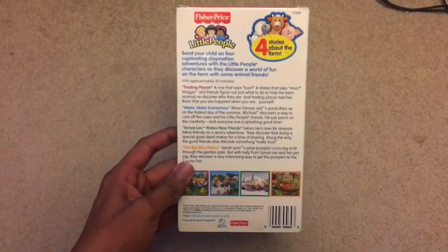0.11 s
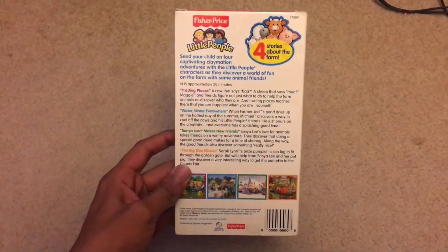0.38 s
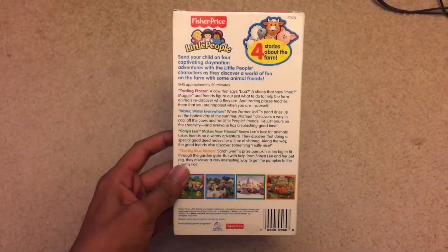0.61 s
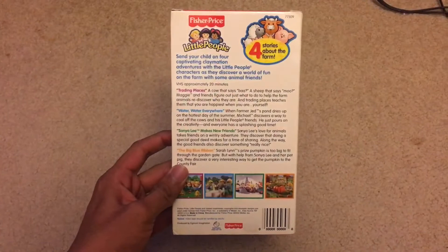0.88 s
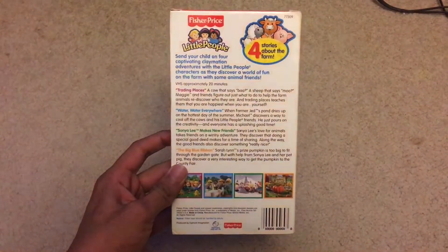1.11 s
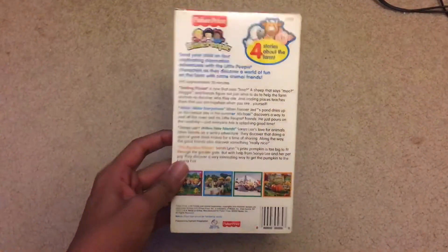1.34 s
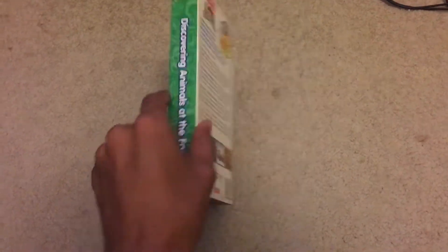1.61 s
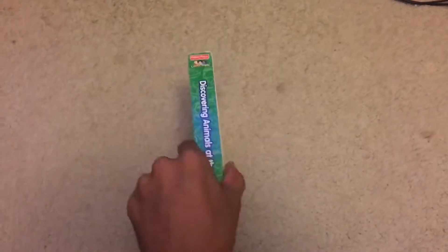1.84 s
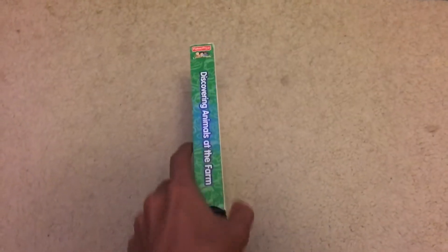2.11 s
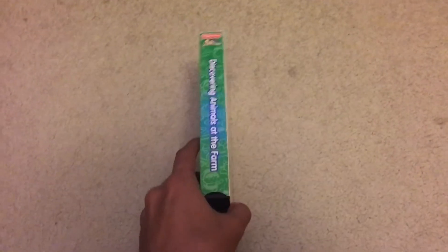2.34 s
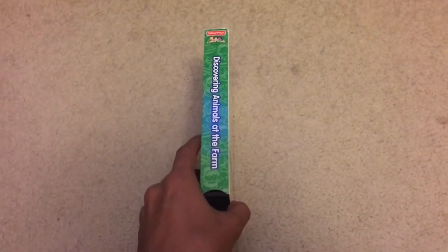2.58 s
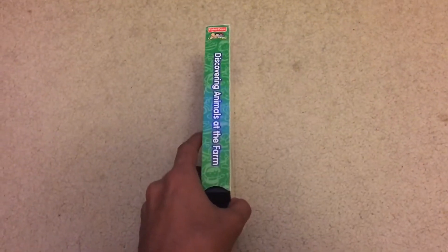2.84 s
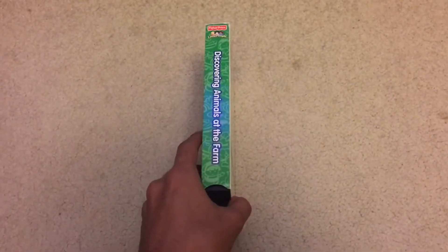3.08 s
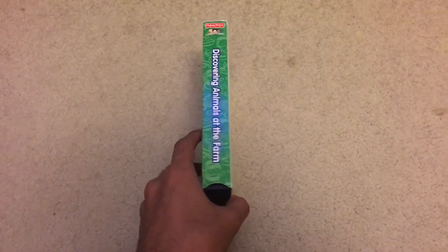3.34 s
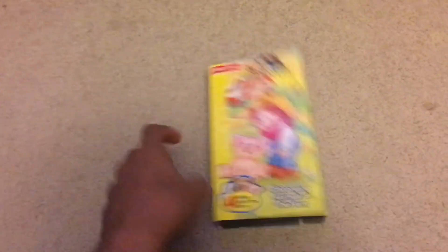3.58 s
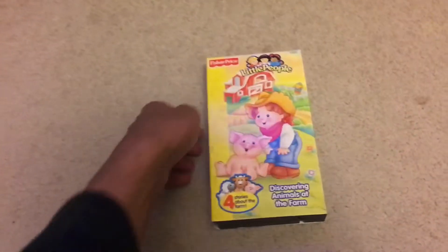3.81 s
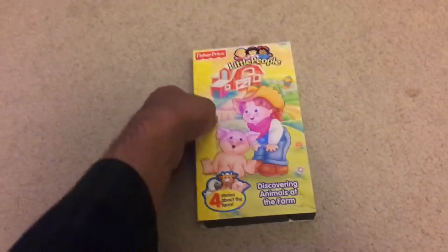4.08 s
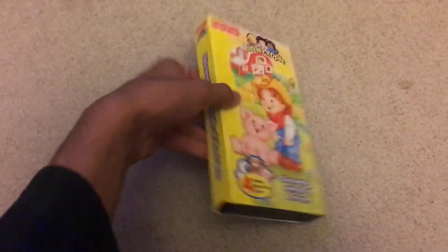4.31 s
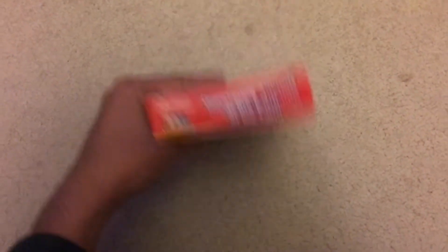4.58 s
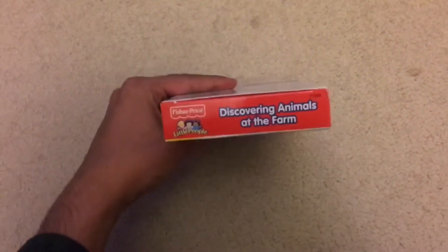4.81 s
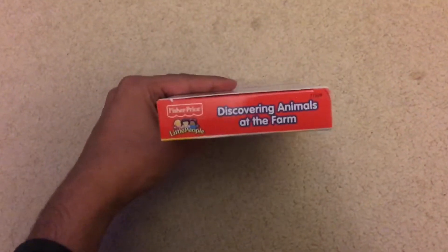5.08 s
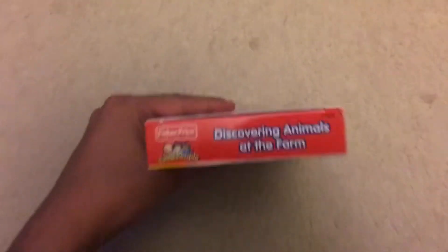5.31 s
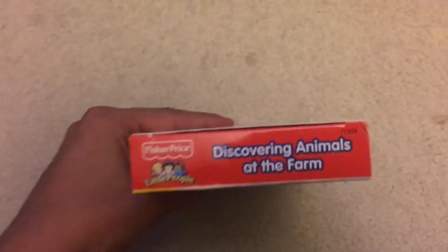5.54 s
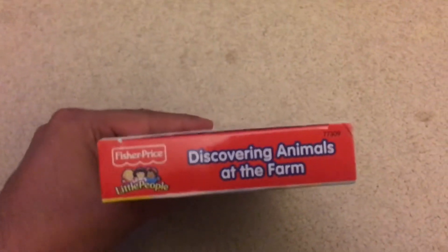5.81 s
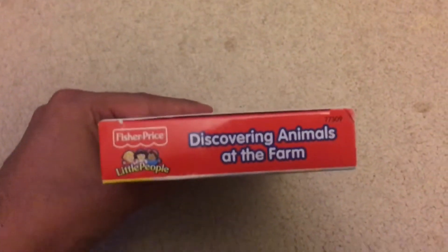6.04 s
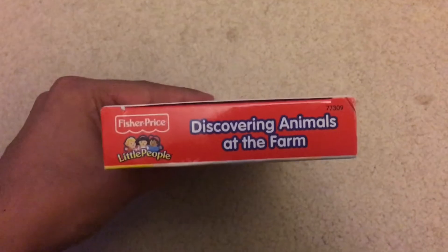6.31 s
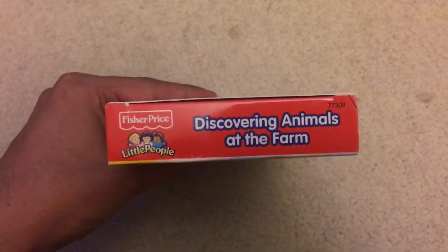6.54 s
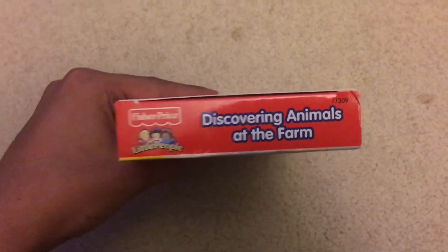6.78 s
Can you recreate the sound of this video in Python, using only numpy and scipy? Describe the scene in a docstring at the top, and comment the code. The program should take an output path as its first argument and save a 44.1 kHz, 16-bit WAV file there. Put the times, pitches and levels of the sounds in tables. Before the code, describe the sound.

A low, soft ventilation hum with faint hiss runs throughout in a small carpeted room, its tone shifting slightly around 4.6 s. Nothing else happens until about 1.3 s, when fingers rub lightly on card with a tiny tick. At 1.7 s a loud, tight cluster of hard plastic knocks rattles in the sleeve, lasting a few hundredths of a second, with a short tail. Soft dry rubs follow from 1.9 to 2.4 s, then calm. Faint ticks at 3.3 s precede a short, lower, duller thump at 3.53 s and a click at 3.6 s. From 3.9 to 4.5 s, scuffs and crisp ticks thicken, with a sharp snap at 4.42 s, into a hollow clattering rattle at 4.53 s. Sparse small clicks come near 5.0, 5.3, 5.8, 5.9, 6.3 and 6.7 s; two brief rubs with ticks come at 6.8 to 7.0 s.

```python
"""Knocks and rattles come in three groups over a low hum, with short ticks and rubbing around them.
A hand turns a cardboard sleeve with a hard plastic cassette inside, over a carpet in a small quiet room.
Knocks are pushes on decaying modes plus bursts of dense contacts; ticks are short band-limited crackles.
Rubs are rough noise that swells and fades; low ventilation hum and microphone hiss are one shaped noise.
A tail of decaying noise bands gives the handling sounds their room."""
import sys
import numpy as np
from scipy import signal
from scipy.fft import rfft, irfft
from scipy.io import wavfile

SR = 44100
rng = np.random.default_rng(int(sys.argv[2]) if len(sys.argv) > 2 else 0)


def attenuation_scalar(level_db):
    """Turn a level in dB into a linear amplitude multiplier (20 dB per decade)."""
    decades = np.asarray(level_db, float) / 20
    return 10 ** decades


def bounce(signal):
    """Save signal as a 16-bit WAV file at the path given by the first command-line argument."""
    frames = np.transpose(np.atleast_2d(signal))
    limited = np.clip(frames, -1, 1)
    pcm = np.round(limited * 32767).astype(np.int16)
    wavfile.write(sys.argv[1], SR, pcm)


N = 304731   # length in samples


def at_hz(points, hz):
    """Spectral envelope: levels are interpolated along a logarithmic frequency axis."""
    point_hz, value = np.array(points).T
    return np.interp(np.log(hz + 1), np.log(point_hz), value)


def rms_one(x):
    """Normalisation: a signal is scaled to unit root-mean-square."""
    return x / np.sqrt(np.mean(x ** 2) + 1e-20)


def coloured(x, db_of_hz):
    """Linear filtering: each frequency of a noise is weighted by its own gain."""
    hz = np.fft.rfftfreq(len(x), 1 / SR)
    return irfft(rfft(x) * attenuation_scalar(db_of_hz(hz)), len(x))


def ring(force, hz, t60):
    """Damped resonator: a unit impulse starts an exponentially decaying sine of height 1."""
    radius = attenuation_scalar(-60 / (t60 * SR))
    angle = 2 * np.pi * hz / SR
    return signal.lfilter([0, np.sin(angle)], [1, -2 * radius * np.cos(angle), radius ** 2], force + 1e-18)


def grains(size, spread_db):
    """Contact noise: dense tiny impacts of uneven strength and random sign, at unit rms."""
    strength_db = spread_db * np.minimum(rng.exponential(1, size), 4)
    return rms_one(attenuation_scalar(strength_db) * rng.standard_normal(size))


def add(out, s, piece):
    """Superposition: a piece is summed into the track at time s."""
    i = round(s * SR)
    out[i:i + len(piece)] += piece[:N - i]


# relative spectrum of ventilation hum and hiss: hz [Hz], density_db [dB per Hz]
HUM_SPECTRUM = [(15, -20), (25, -17), (48, -1), (161, -3), (185, -9.5), (270, -14), (309, -10.5),
                (439, -19), (591, -18), (641, -27), (695, -20), (1070, -17.5), (5000, -40), (9070, -42),
                (16000, -45)]
# resonances in the hum: centre_hz [Hz], width_hz [Hz],
# before_db, after_db [dB added at the centre, before and after the change in the hum]
HUM_RESONANCES = [(115, 12, 4, 7.5), (162.4, 4.7, 12, 4.5), (229, 25, 4.5, 9), (308.5, 23, 5.5, 8.5),
                  (410, 67, -4.5, -8), (600, 60, 4, 1.5), (664, 110, 7, 9.5), (1100, 90, 3, -2),
                  (1332, 37, 5, 0), (1720, 21, 8.5, 9.5), (5000, 420, -1, -1), (10360, 810, -4.5, -4)]


def hum(hum_db=-53.5, change_s=4.6, fade_s=0.4):
    """Resonant filtering of stationary noise; the heights of its peaks change around change_s."""
    white = rng.standard_normal(N)

    def steady_noise(column):
        def spectrum_db(hz):
            total_db = at_hz(HUM_SPECTRUM, hz)
            for peak in HUM_RESONANCES:
                total_db = total_db + peak[column] / (1 + (2 * (hz - peak[0]) / peak[1]) ** 2)
            return total_db
        return rms_one(coloured(white, spectrum_db))

    before, after = steady_noise(2), steady_noise(3)
    changed = np.clip((np.arange(N) / SR - change_s) / fade_s + 0.5, 0, 1)
    return attenuation_scalar(hum_db) * ((1 - changed) * before + changed * after)


# reverberation time before the extra late absorption: hz [Hz], t60_s [s]
REVERBERATION = [(100, 0.26), (500, 0.3), (1500, 0.41), (4000, 0.26), (12000, 0.091)]


def room(x, first_ms=3, early_s=0.11):
    """Diffuse reverberation: convolution with octave bands of noise, each decaying at its own rate."""
    t = np.arange(SR // 3) / SR
    tail = np.zeros(len(t))
    for low_hz in 62.5 * 2.0 ** np.arange(8):
        band = signal.butter(2, [low_hz, 2 * low_hz], "band", fs=SR, output="sos")
        t60 = at_hz(REVERBERATION, 1.1 * low_hz)
        tail += signal.sosfilt(band, rng.standard_normal(len(t))) * attenuation_scalar(-60 * t / t60)
    # the early reflections hold up, then carpet and furniture swallow the rest quickly
    tail *= (1000 * t > first_ms) * np.exp(-(t / early_s) ** 3)
    unit_energy_tail = tail / np.sqrt(np.sum(tail ** 2))
    return signal.fftconvolve(x, unit_energy_tail)[:N]


# strokes of skin sliding over the sleeve: start_s, fastest_s, end_s [s], level_db [dB at the fastest]
RUB_STROKES = [(1.28, 1.37, 1.6, -73), (1.873, 1.944, 2.07, -70.5), (1.97, 2.05, 2.16, -70),
               (2.16, 2.29, 2.36, -70.5), (3.27, 3.33, 4.1, -74.5), (3.661, 3.75, 3.88, -75.5),
               (3.92, 4.06, 4.11, -69.5), (4.132, 4.225, 4.28, -63.5), (4.253, 4.313, 4.326, -61),
               (4.354, 4.40, 4.45, -71.5), (4.446, 4.49, 4.52, -63.5), (6.705, 6.81, 6.86, -66.5),
               (6.79, 6.9, 7.0, -62.5)]
# relative colour of the rubbing: hz [Hz], gain_db [dB]
RUB_SPECTRUM = [(800, -6.5), (2500, 1.5), (5000, -3), (8000, -6.5), (9800, -4), (10500, -11), (12000, -8.5),
                (16000, -13)]


def rubs(ends_db=-9.5):
    """Stick-slip friction: fine grains whose level swells to the fastest moment and fades.
    ends_db is the level at the start and end of a stroke, relative to its fastest moment."""
    t, power = np.arange(N) / SR, np.zeros(N)
    for start, fastest, end, db in RUB_STROKES:
        swell_db = np.interp(t, [start, fastest, end], [ends_db, 0, ends_db], left=-60, right=-60)
        power += attenuation_scalar(db + swell_db) ** 2
    friction = coloured(grains(N, spread_db=5.5), lambda hz: at_hz(RUB_SPECTRUM, hz))
    return np.sqrt(power) * rms_one(friction)


# short band-limited ticks: fingers, creasing card and two late cassette contacts after the knocks:
# start_s [s], level_db [dB rms before rise and decay],
# t60_s [s], ring_hz [Hz, strongest ring], top_hz [Hz, upper edge of the band]
SHORT_TICKS = [(1.4042, -59, .015, 6000, 11000), (1.6815, -51.5, 0.088, 2600, 8400),
               (1.825, -57, 0.074, 4000, 8500), (1.934, -60, .015, 6000, 8000),
               (3.328, -57, 0.012, 4500, 9000), (3.3814, -57.5, 0.025, 7000, 13900),
               (3.598, -43.5, 0.022, 2200, 4200), (3.7767, -53, 0.027, 3400, 7000),
               (4.0547, -55.5, .037, 2230, 6930), (4.0640, -59, .036, 700, 2000),
               (4.159, -46.5, 0.0088, 5530, 8650), (4.1792, -48.5, 0.062, 2330, 5000),
               (4.183, -48, 0.031, 1550, 8850), (4.2273, -43.5, 0.029, 2160, 8400),
               (4.2318, -43.5, 0.028, 1390, 6800), (4.2370, -39, 0.013, 2780, 6960),
               (4.271, -60, .03, 1200, 3500), (4.347, -61.5, 0.029, 2520, 8000),
               (4.4203, -35, 0.006, 2400, 9900), (4.4595, -49, 0.074, 4100, 7000),
               (4.4764, -44, 0.036, 5870, 11900), (4.479, -50.5, 0.065, 2150, 3990),
               (4.4870, -48.5, 0.029, 1100, 3030), (4.507, -47, 0.039, 1400, 4520),
               (5.031, -55.5, .012, 4500, 8000), (5.3446, -50, 0.0092, 6500, 15000),
               (5.7653, -53, 0.015, 3540, 6000), (5.9043, -52, 0.01, 3200, 14150),
               (6.269, -60.5, .046, 1300, 2600), (6.6617, -54.5, 0.028, 1900, 3600),
               (6.7984, -51, .015, 6500, 11000), (6.8671, -47.5, 0.023, 2500, 5600)]


def ticks(rise_ms=0.6, ring_db=-12, cycles=5, bottom_share=0.6):
    """Impulsive excitation of a resonance: a short band-limited crackle drives one brief ring.
    bottom_share sets the band's lower edge, cycles the ring's t60, both relative to its pitch."""
    t, out = np.arange(SR // 10) / SR, np.zeros(N)
    for s, db, t60, ring_hz, top_hz in SHORT_TICKS:
        band = signal.butter(2, [bottom_share * ring_hz, top_hz], "band", fs=SR, output="sos")
        crackle = signal.sosfilt(band, grains(len(t), spread_db=2.5))
        crackle *= attenuation_scalar(db) / np.std(crackle)
        crackle *= attenuation_scalar(-60 * t / t60) * (1 - np.exp(-1000 * t / rise_ms))
        add(out, s, crackle + attenuation_scalar(ring_db) * ring(crackle, ring_hz, cycles / ring_hz))
    return out


# knocks of the cassette in the sleeve: start_s [s], rattle_db [dB, before rise and bass cut],
# rattle_t60_s [s], thud_db [dB, strength of the push]
CASSETTE_KNOCKS = [(1.7168, -12.5, 0.042, -9), (1.7206, -18, 0.066, -19), (1.7245, -16, 0.035, -22),
                   (1.7317, -13.5, 0.046, -16), (1.734, -17, 0.038, -24.5), (1.7370, -29.5, 0.028, -23.5),
                   (1.7473, -40, .04, -26.5), (3.5275, -22, 0.049, -36), (3.5308, -31, 0.13, -6.5),
                   (3.5443, -30.5, 0.078, -44), (4.5121, -42, .05, -46.5), (4.519, -34, 0.082, -42),
                   (4.5250, -24.5, 0.046, -53.5), (4.5278, -16, 0.045, -38), (4.5311, -17, .06, -16),
                   (4.5342, -19, 0.043, -31), (4.5390, -19, 0.047, -40), (4.5480, -29.5, 0.078, -35),
                   (4.566, -26, 0.028, -39), (4.591, -41, 0.092, -40)]
# the face that lands changes with each turn (edge, flat side on the carpet, end): turn_start_s [s]
TURN_STARTS = [1.5, 3.3, 4.4]
# relative colour of the rattle, one list for each face: hz [Hz], density_db [dB per Hz]
RATTLE_SPECTRA = [
    [(180, -30.5), (300, 0.5), (689, -9), (842, -10), (1390, -11), (1640, -4.5), (1810, -12.5), (2880, -10),
     (3400, -15.5), (6100, -14.5), (8090, -19), (15000, -30.5), (16000, -37)],
    [(290, -22), (500, -2.5), (698, -5), (946, 2.5), (1130, 1.5), (1250, -1.5), (2290, -9), (3060, -5),
     (3540, -14.5), (4210, -7.5), (4870, -15.5), (7210, -21), (16000, -36)],
    [(180, -39), (300, 0.5), (546, -7.5), (614, -0.5), (787, -21), (930, 3.5), (1030, -9), (1150, -5),
     (1560, -10), (2980, -6.5), (3460, -15.5), (6850, -17), (16000, -37)],
]
# the sleeve's low modes: mode_hz [Hz], t60_s [s], edge_db, flat_db, end_db [dB for each face]
SLEEVE_MODES = [(97, 0.24, -25, -17, -22), (163, 0.13, -20.5, -10.5, -20.5), (208, .04, -21.5, -2.5, -16),
                (239, .14, -19.5, -10, -5), (272, 0.055, -4.5, -0.5, -25), (306, 0.064, 1.5, -15.5, -20),
                (362, .04, -16.5, -12, -4.5), (505, .045, 0.5, -45, -14), (600, 0.034, -15, -36, -6.5),
                (660, 0.067, -2, -28, -9.5), (716.7, .06, -9, -21, -14), (917, 0.034, -15, -5.5, 2)]
# held in the air the sleeve radiates little bass; flat on the floor it thumps: cut_hz [Hz for each face]
BASS_CUTS = [260, 84, 170]
# the whole sleeve is jolted and pushes a low puff of air: dB for each face, band edges in Hz
PUFF_DB, PUFF_HZ = [-6, -30, 1.5], [60, 109.7]


def knocks(thud_ms=0.9, rise_ms=0.84):
    """Modal excitation by impact: a soft push rings the low modes under a dying rattle of hard contacts."""
    # light contacts shake only small parts and sound thinner: dB, dB per octave per dB, dB per octave
    full_rattle_db, thinning_per_db, thinnest_tilt = -12.5, 0.2, 1.6
    t, out = np.arange(SR // 8) / SR, np.zeros(N)
    width = thud_ms / 1000
    push_shape = np.sin(np.pi * np.minimum(t / width, 1)) ** 2 / (width * SR)
    faces = np.searchsorted(TURN_STARTS, np.array(CASSETTE_KNOCKS)[:, 0]) - 1
    for face, colour in enumerate(RATTLE_SPECTRA):
        push, rattle = np.zeros(N), np.zeros(N)
        for s, rattle_db, t60, thud_db in np.array(CASSETTE_KNOCKS)[faces == face]:
            tilt = min(thinning_per_db * (full_rattle_db - rattle_db), thinnest_tilt)

            def spectrum_db(hz):
                return at_hz(colour, hz) + tilt * np.log2((hz + 100) / 2000)

            burst = rms_one(coloured(grains(len(t), spread_db=1.6), spectrum_db))
            envelope = attenuation_scalar(rattle_db - 60 * t / t60) * (1 - np.exp(-1000 * t / rise_ms))
            add(rattle, s, envelope * burst)
            add(push, s, -attenuation_scalar(thud_db) * push_shape)
        thud = sum(attenuation_scalar(dbs[face]) * ring(push, hz, t60) for hz, t60, *dbs in SLEEVE_MODES)
        sound = rattle + thud
        bass_cut = signal.butter(3, BASS_CUTS[face], "high", fs=SR, output="sos")
        puff_band = signal.butter(2, PUFF_HZ, "band", fs=SR, output="sos")
        out += signal.sosfilt(bass_cut, sound)
        out += attenuation_scalar(PUFF_DB[face]) * signal.sosfilt(puff_band, sound)
    return out


def scene(room_db=-15.5):
    """Superposition of direct sound, its reverberation and the background hum, in one channel."""
    background = hum()
    hand = rubs() + ticks() + knocks()
    return (hand + attenuation_scalar(room_db) * room(hand) + background)[None]


def roll_off(x):
    """The treble ends steeply here."""
    return signal.sosfilt(signal.butter(12, 16480, fs=SR, output="sos"), x)


def record(dry):
    """Band limitation: the recorder loses the deepest bass and the top."""
    bass_cut = signal.butter(2, 45, "high", fs=SR, output="sos")
    top_cut = signal.cheby2(12, 60, 16900, fs=SR, output="sos")
    mix = signal.sosfilt(top_cut, signal.sosfilt(bass_cut, dry))
    return roll_off(mix)


dry = scene()
out = record(dry)
bounce(out)
```